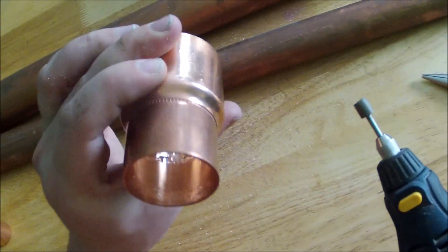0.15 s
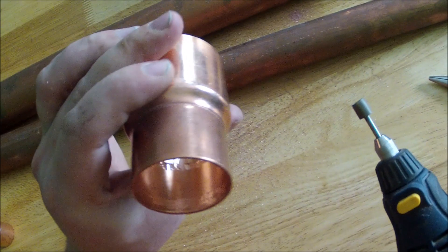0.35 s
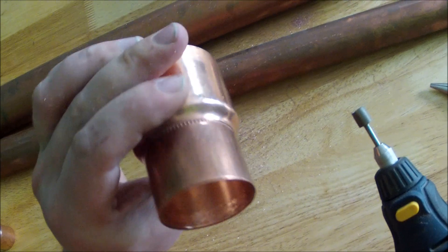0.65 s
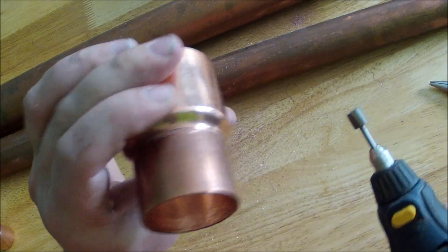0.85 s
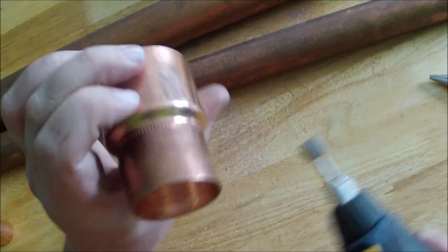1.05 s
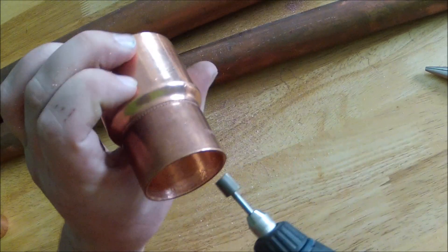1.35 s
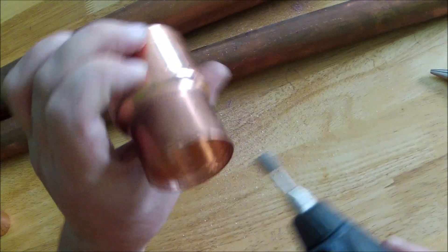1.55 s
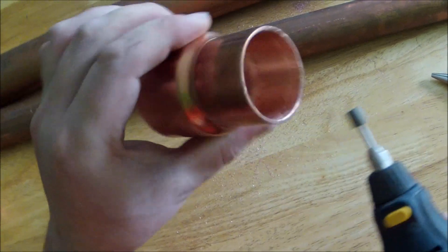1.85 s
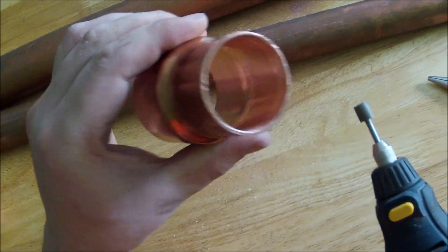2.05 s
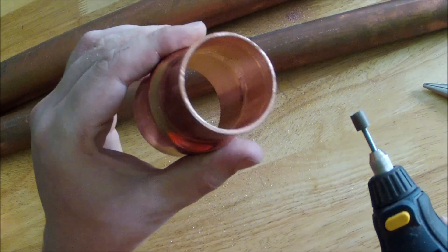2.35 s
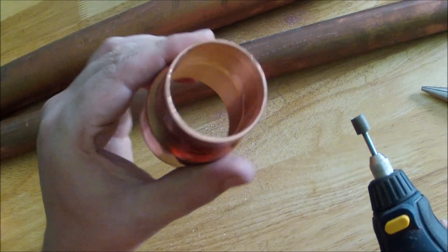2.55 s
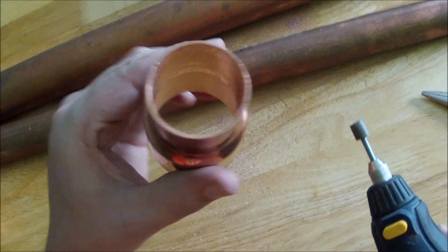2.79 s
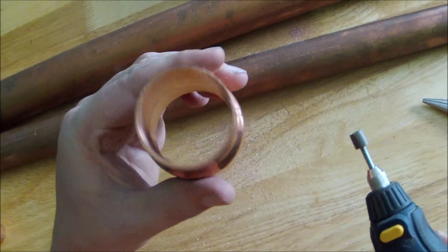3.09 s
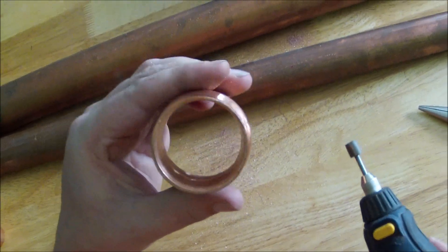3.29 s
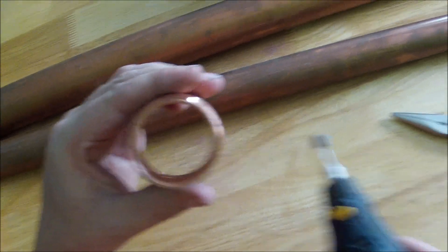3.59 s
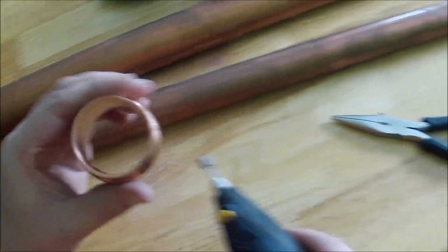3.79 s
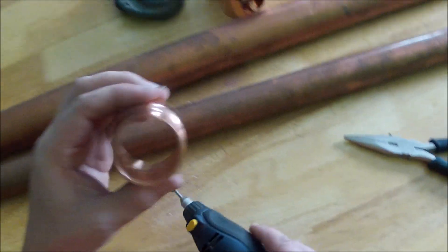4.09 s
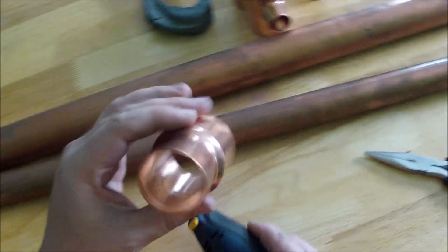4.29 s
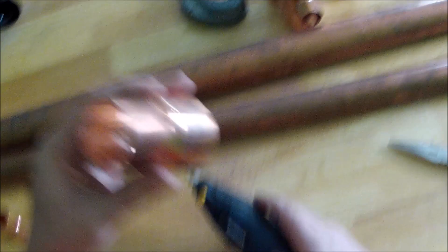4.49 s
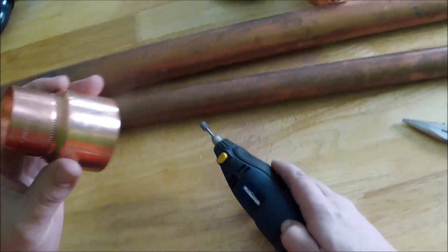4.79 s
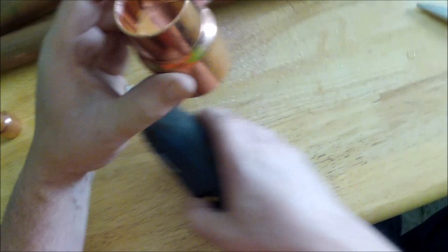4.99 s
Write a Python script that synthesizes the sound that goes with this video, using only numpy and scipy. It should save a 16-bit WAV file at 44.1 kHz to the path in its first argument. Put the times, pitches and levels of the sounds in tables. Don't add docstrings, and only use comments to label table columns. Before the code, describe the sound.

Close, lo-fi whine of a handheld rotary grinder, creeping up in pitch, then coasting down after switch-off, ending in a light plastic click and brief squeal.

```python
import sys
import numpy as np
from scipy import signal
from scipy.io import wavfile
from scipy.ndimage import uniform_filter1d

SR = 44100
rng = np.random.default_rng(int(sys.argv[2]) if len(sys.argv) > 2 else 0)


def unload_audio(sound):
    columns = np.transpose(np.atleast_2d(sound))
    steps = np.round(np.clip(columns, -1, 1) * 32767)
    wavfile.write(sys.argv[1], SR, steps.astype(np.int16))


def elevation(decibels):
    levels = np.asarray(decibels, float)
    return 10 ** (levels / 20)


N = 226629
PULL_HZ, POWER_OFF_S = 120, 3.17


def read(points, at, log=False):
    x, *columns = np.transpose(points)
    if log:
        x, at = np.log(x + 1), np.log(at + 1)
    return np.array([np.interp(at, x, column) for column in columns])


def evened(x):
    return x / np.sqrt(np.mean(abs(x) ** 2) + 1e-20)


def drift(hz, step=32):
    count = N // step + 1
    noise = rng.standard_normal((count, 2)) @ [1, 1j]
    r = np.exp(-2 * np.pi * hz * step / SR)
    for _ in range(2):
        noise = signal.lfilter([1 - r], [1, -r], noise)
    return np.repeat(evened(noise), step)[:N]


def dips(t, rows):
    return elevation(sum(db * np.exp(-((t - s) / length * 2) ** 2) for s, length, db in rows))


# (time [s], length [s], noise gain [dB])
GAPS = [
    (1.202, .016, -20),
    (1.435, .009, -24),
]


def bridged(t):
    return dips(t, GAPS)


# (time [s], speed [Hz])
SPEED = [(0.0, 373.7), (0.3, 390.8), (0.62, 401), (1.0, 409.7), (1.5, 417.3), (2.3, 426.8), (3.0, 433.3),
         (3.155, 431.8), (3.2, 426.5), (3.25, 417.5), (3.33, 402.4), (3.46, 379.5), (3.7, 343),
         (3.85, 318.5), (4.1, 282), (4.5, 228.6), (4.85, 182.8), (5.14, 150.5)]


def shaft_speed(t):
    return read(SPEED, t)[0]


# (frequency [Hz], level [dB])
HUM = [(120, -88), (240, -71)]


def coil_hum(t, powered):
    return sum(elevation(db) * powered * np.sin(2 * np.pi * hz * t) for hz, db in HUM)


# (time [s], level [dB])
IMBALANCE = [(0.0, -40), (0.13, -48), (0.36, -39.5), (0.5, -44), (0.65, -42), (0.88, -42), (1.05, -38),
             (1.45, -36.5), (1.75, -38.5), (2.12, -52.5), (2.4, -47.5), (3.0, -45.5), (3.2, -44),
             (3.5, -49), (4.0, -62.5), (4.42, -67.5), (4.5, -78), (5.14, -91)]
# (time [s],
# length [s], gain [dB])
NULLS = [
    (1.208, 0.011, -3),
    (3.242, 0.022, -4.5),
    (3.283, 0.1, 7.5),
    (3.333, 0.018, -13),
    (3.385, .016, 1.5),
    (3.434, 0.015, 2.5),
    (3.488, 0.028, -8),
    (3.71, 0.2, 5.5),
]


def imbalance(t):
    return elevation(read(IMBALANCE, t)[0]) * dips(t, NULLS)


# (time [s], level [dB])
SLOTS = [(0.0, -66), (0.12, -52), (0.42, -63), (0.62, -64), (0.9, -57), (1.15, -53), (1.38, -48),
         (1.72, -51.5), (2.22, -47.5), (2.45, -52), (2.62, -48.5), (2.88, -54), (3.02, -50), (3.3, -52.5),
         (3.45, -61), (3.9, -62), (4.1, -74), (4.9, -88)]


def slots(t):
    return elevation(read(SLOTS, t)[0])


# (frequency [Hz], level [dB])
BRUSHES = [(2680, -86), (2800, -65), (3050, -59), (3900, -62), (4600, -55), (5300, -62), (6060, -66),
           (6230, -84)]


def brushes(hz):
    return elevation(read(BRUSHES, hz)[0])


# (time [s], level [dB])
PLAY = [(0.0, -10), (0.2, -10), (0.34, 1), (0.7, 7), (0.9, 12), (1.2, 9.5), (1.5, 4.5), (1.9, 1.5),
        (2.5, 0.3), (3.1, 0), (3.205, 0), (3.22, 9), (3.3, 6.5), (3.42, -5), (3.75, -11), (4.3, -21),
        (5.14, -25)]
# (resting level [dB], share of the play [ratio])
LOOSE = [(-61, .95), (-67, 1.05), (-65, 1.05), (-66, 1.05), (-72, 1.05), (-66, .7), (-68, .95), (-72, .9)]
# (time [s], length [s], gain [dB])
LOBES = [
    [(0.1, 0.24, 6), (1.78, 0.25, -17), (3.28, 0.19, -7), (3.47, 0.39, -8)],
    [(0.42, .3, 8), (1.68, .3, 6), (3.19, .05, -5), (3.25, .1, 5)],
    [(0.1, .4, 12), (0.5, 0.34, -11), (1.1, .35, 1), (3.19, 0.037, 8)],
    [(0.22, 0.38, 13), (0.68, 0.28, 7), (1.1, 0.29, -9), (3.45, 0.24, 10.5), (3.88, 0.33, 15),
     (4.3, 0.37, 21.5)],
    [(0.58, 0.59, 7), (1.5, .35, -5)],
    [(0.0, 0.21, 16), (0.6, 0.29, -12), (1.75, 0.78, 8.5), (3.25, 0.19, -4), (3.92, 0.55, 13.5)],
    [(0.3, .4, 12), (0.6, .15, -11), (1.12, .3, -15), (1.5, .4, 3), (3.27, .2, 8)],
    [(0.33, .2, 12), (0.7, .25, 8), (1.05, 0.28, -3), (3.93, .3, 22)],
]


def loose_orders(t):
    play_db = read(PLAY, t)[0]
    return [elevation(db + share * play_db) * dips(t, rows) for (db, share), rows in zip(LOOSE, LOBES)]


THROB_DB = -67.5
# (time [s], length [s], gain [dB])
HARD_PULL = [
    (0.0, 0.27, 1.9),
    (1.1, 2.04, 12.5),
]


def mains_throb(t):
    return elevation(THROB_DB) * dips(t, HARD_PULL)


SHELL_HZ, SHELL_WIDTH_HZ, SHELL_GAIN = 3260, 88, 0.38


def shell_lift(hz):
    return 1 + SHELL_GAIN / (1 + ((hz - SHELL_HZ) / SHELL_WIDTH_HZ) ** 2)


FOLLOWS = [(1, 0), (2, 8), (3, 3), (4, 7), (5, 4), (6, 9), (7, 5), (8, 1), (9, 6), (10, 10), (11, 7),
           (12, 6), (13, 7), (15, 2), (16, 2), (17, 2), (14, 2)]
# (offset from that level [dB], lower, upper mains sideband under the throb [dB])
ORDER_DB = [(-0.52, -9, -11), (-3.1, -23, -26), (0, -12, -23), (3, -16.5, -16), (-0.4, -14.5, -17.5),
            (-0.9, -10, -13), (-0.1, -9, -6.5), (-0.9, -9, -6), (1.6, -7.5, -13), (0.3, -10, -38),
            (-2, -15, -6), (-9, -38, -12.5), (-26, -31, -25), (-19.5, -22, -19), (0, -32, -20),
            (-11.5, -15, -19), (-14.5, -38, -55)]
BRIDGED_ORDERS = (1, 3, 7, 8, 11)
# (time [s], length [s], gain [dB])
SLOT_PULL = [
    (0.2, .7, 7),
]


def motor(t, flutter=0.05, flutter_hz=45, wander=0.37, wander_hz=2.6, second=0.52, swell=0.24, swell_hz=4,
          slack_hz=270):
    skip, fading, fading_hz = 3, .045, 50
    t = t[::skip]
    speed = shaft_speed(t)
    levels = [imbalance(t), slots(t), np.ones(len(t)), *loose_orders(t)]
    turn = 2 * np.pi * np.cumsum(speed) * skip / SR
    pull = np.exp(2j * np.pi * PULL_HZ * t)
    powered = np.clip((POWER_OFF_S - t) / 0.032 + 1, 0, 1)
    kept = bridged(t)
    gliding = np.clip((t - POWER_OFF_S) / 0.14, 0, 1)
    loose = np.clip(slack_hz / speed, 1, 3) ** 2
    throb = mains_throb(t) * powered * kept
    out = coil_hum(t, powered)
    for (order, column), (db, *side_db) in zip(FOLLOWS, ORDER_DB):
        low, high = [elevation(d) * (np.exp(7j * rng.random()) + wander * drift(wander_hz)[::skip])
                     for d in side_db]
        shake = 1 + flutter * np.sqrt(order) * loose * kept * drift(flutter_hz)[::skip]
        shake += swell * (column > 2) * drift(swell_hz)[::skip]
        fade = fading * (order - 1) * gliding
        shake = (shake + fade * drift(fading_hz)[::skip]) / np.sqrt(1 + fade ** 2)
        line = levels[column] * elevation(db) * shake * (1 if order in BRIDGED_ORDERS else kept)
        if column == 2:
            line = line * brushes(order * speed)
        lift = [shell_lift(order * speed + k * PULL_HZ) for k in (-1, 1, 2)]
        sides = lift[0] * low / pull + lift[1] * high * pull
        sides = sides + second * lift[2] * abs(high) * pull ** 2
        line = line + throb * sides * (dips(t, SLOT_PULL) if column == 1 else 1)
        out += (line * np.exp(1j * order * turn + 7j * rng.random())).real
    return np.sqrt(2) * signal.resample_poly(out, skip, 1)[:N]


AIR_EDGES_HZ = (30, 200, 1000, 2600, 5500)
# (frequency [Hz], level at full speed [dB], level when nearly stopped [dB])
HOUSING = [(30, -96.5, -85), (200, -95, -86), (318, -80.5, -81), (573, -74, -80), (818, -85.5, -97),
           (1260, -77, -95), (1670, -83, -100), (2134, -76.5, -86.5), (2510, -80, -91), (3225, -73.5, -84),
           (3930, -83, -78.5), (4890, -80, -77), (5120, -84.5, -82), (6040, -91, -92)]
# (time [s], level [dB])
FLOW = [(0.0, -3), (0.45, 0.5), (0.6, 1), (0.78, 3), (1.2, 2), (1.65, -0.5), (1.8, -0.5), (2.1, 0.1),
        (3.3, 0.2), (3.9, -4.5), (4.5, -4.5), (4.65, -8), (5.14, -16)]
# (level at full speed [dB], share of the air stream [ratio], change when slow [dB])
AIR_LAW = [
    (-82, 0.01, 3),
    (-59, 0.05, -10.5),
    (-58.5, 0.61, -0.5),
    (-55.5, 1.04, -0.9),
]
# (time [s], length [s], gain [dB])
HANDLING = [
    (0.0, 0.075, 14),
    (1.3, 0.13, 6),
    (1.603, 0.44, 8),
    (2.1, .15, 4),
]


def air(t, patchy_db=1.5, throb=0.1, per_turn=0.13):
    hz = np.fft.rfftfreq(1024, 1 / SR)
    frames = np.arange(N // 256 + 5) * 256 / SR
    fast_db, slow_db = read(HOUSING, hz, log=True)
    fast = np.clip((shaft_speed(frames) - 220) / 190, 0, 1)
    colour_db = np.outer(fast_db, fast) + np.outer(slow_db, 1 - fast)

    bands = list(zip(AIR_EDGES_HZ, AIR_EDGES_HZ[1:]))
    held_db = [10 * np.log10((elevation(colour_db[(hz > a) & (hz < b)]) ** 2).sum(0)) for a, b in bands]
    flow_db = read(FLOW, frames)[0]
    band_db = np.array([db + share * flow_db + slow * (1 - fast) for db, share, slow in AIR_LAW])
    band_db[0] += 20 * np.log10(dips(frames, HANDLING))
    centres_hz = np.mean(bands, 1) + [62, -300, 10, 13]
    lift_db = np.transpose([np.interp(hz, centres_hz, row) for row in (band_db - held_db).T])

    a, b, patches = rng.standard_normal((len(frames), len(hz), 3)).T
    patches = evened(uniform_filter1d(uniform_filter1d(patches, 8, 0), 14, 1))
    spectrum = (a + 1j * b) * elevation(colour_db + lift_db + patchy_db * patches)
    noise = signal.istft(spectrum, nperseg=1024, noverlap=768)[1][:N]
    turns = np.cumsum(shaft_speed(t)) / SR
    mains = throb * (t < POWER_OFF_S) * np.cos(2 * np.pi * PULL_HZ * t)
    noise *= 1 + mains + per_turn * np.cos(2 * np.pi * turns)
    return elevation(2.5) * bridged(t) * noise


# (time [s], length [s], base [Hz], third partial [dB], fourth partial [dB])
SQUEALS = [
    (4.745, 0.057, 1182, -88, -61),
    (4.963, .22, 1180, -64.5, -69),
]
SLIDE_HZ_PER_S, SQUEAL_RISE, SQUEAL_FALL_S = 900, 0.29, 0.039


def squeals(t):
    out, rough, rough_hz = np.zeros(N), .7, 45
    for s, length, hz, *levels_db in SQUEALS:
        age = np.maximum(t - s, 0)
        rise = np.clip(age / (SQUEAL_RISE * length), 0, 1)
        fall = np.clip((length - age) / SQUEAL_FALL_S, 0, 1)
        turn = 2 * np.pi * (hz - SLIDE_HZ_PER_S * age / 2) * age
        for multiple, db in zip((3, 4), levels_db):
            partial = (1 + rough * drift(rough_hz)) * np.exp(1j * multiple * turn)
            out += rise * fall * elevation(db) * partial.real
    return out


# (time [s], peak [dB], frequency [Hz], t60 [s])
TICKS = [
    (4.747, -57, 3100, .014),
    (4.7503, -41, 4760, 0.0082),
    (4.75, -43, 2710, 0.0078),
    (4.751, -45, 3650, .005),
    (4.776, -51, 4400, .006),
    (5.05, -66, 316, 0.82),
]


def ticks(t, rise_cycles=0.85):
    out = np.zeros(N)
    for s, db, hz, t60 in TICKS:
        age = np.maximum(t - s, 0)
        rise = 1 - np.exp(-age * hz / rise_cycles)
        out += rise * elevation(db - 60 * age / t60) * np.sin(2 * np.pi * hz * age)
    return out


def workshop(x, t60=0.11):
    taps = np.zeros(SR // 2)
    at = np.arange(100, len(taps) - 20, 20)
    taps[at + rng.integers(0, 20, len(at))] = rng.choice([-1., 1.], len(at))
    taps *= elevation(-60 * np.arange(len(taps)) / SR / t60)
    return signal.fftconvolve(x, taps / np.linalg.norm(taps))[:N]


ROOM_DB = -25


def scene():
    t = np.arange(N) / SR
    tool = motor(t) + squeals(t) + ticks(t)
    return (tool + elevation(ROOM_DB) * workshop(tool) + air(t))[None]


def top_cut(x):
    return signal.sosfilt(signal.butter(12, 15770, fs=SR, output="sos"), x)


HELD_SR, REPEATS, EDGE_HZ = 12000, 4, 15310


def record(dry):
    slow = signal.resample_poly(dry, HELD_SR, SR, axis=1, window=("kaiser", 8))
    held = np.repeat(slow, REPEATS, axis=1)
    held = signal.resample_poly(held, SR, HELD_SR * REPEATS, axis=1)[:, :N]
    edge = signal.firwin(511, EDGE_HZ, window=("kaiser", 9), fs=SR)
    mix = signal.oaconvolve(held, edge[None], "same")
    return top_cut(mix)


dry = scene()
out = record(dry)
unload_audio(out)
```